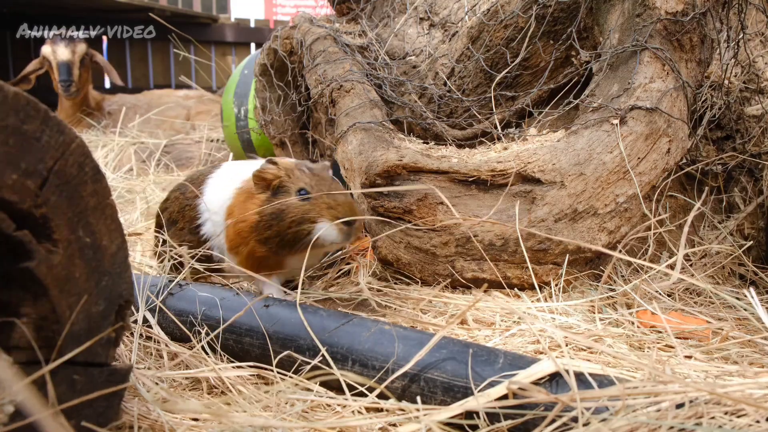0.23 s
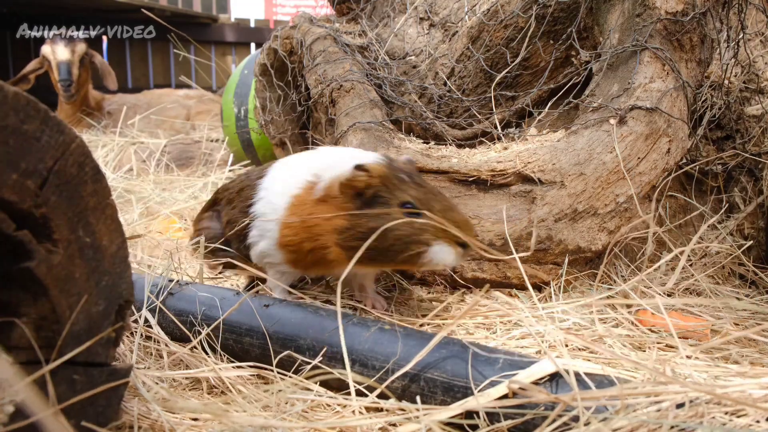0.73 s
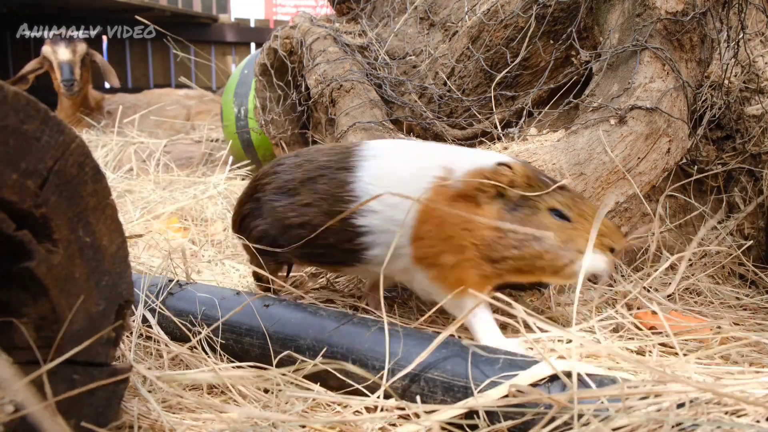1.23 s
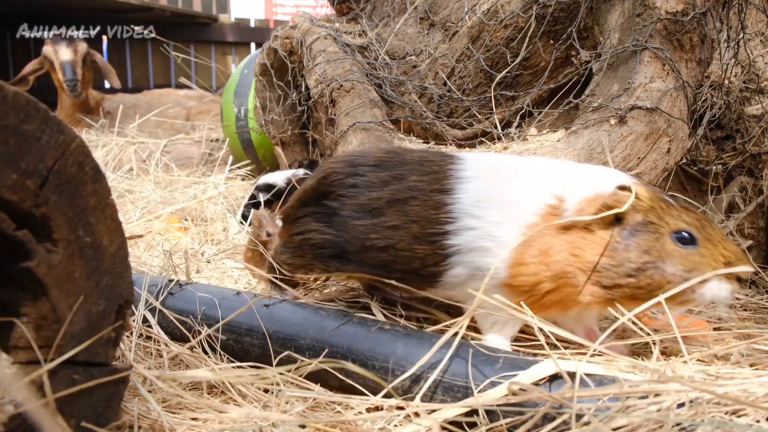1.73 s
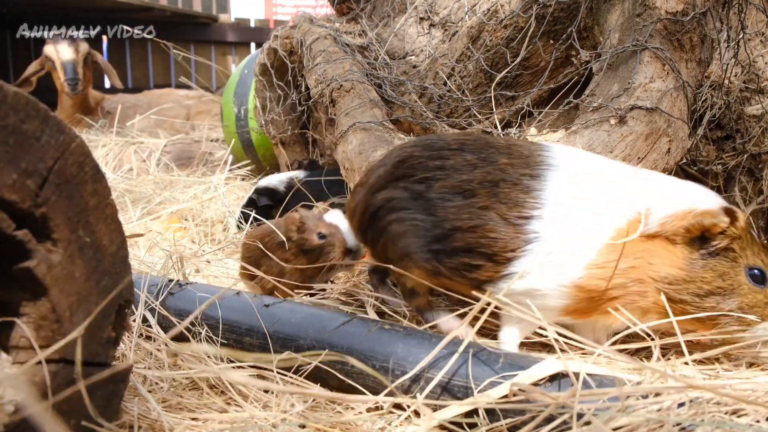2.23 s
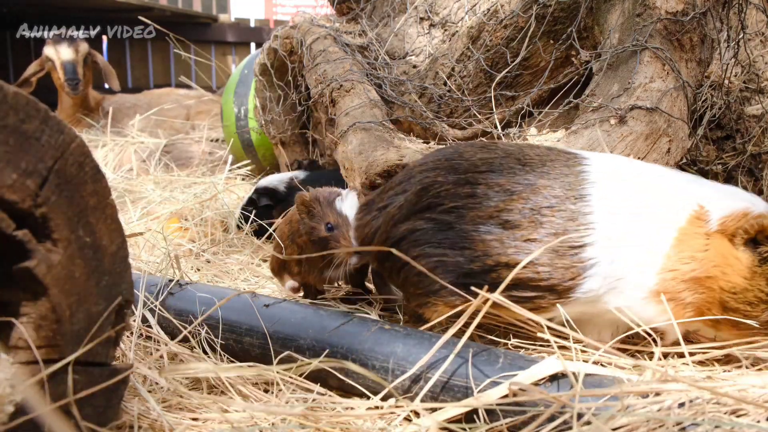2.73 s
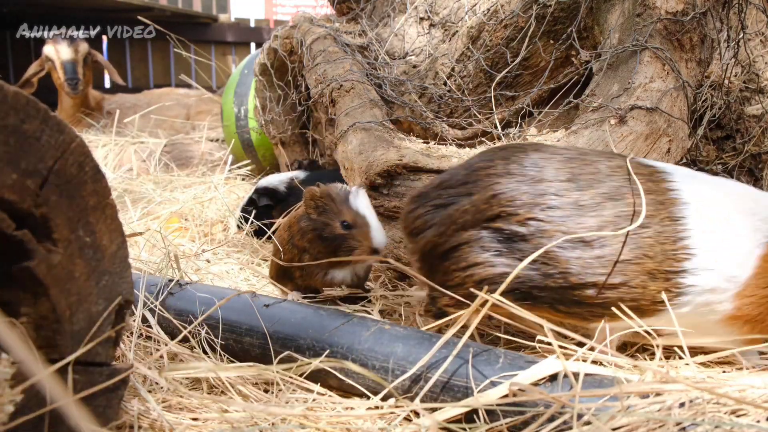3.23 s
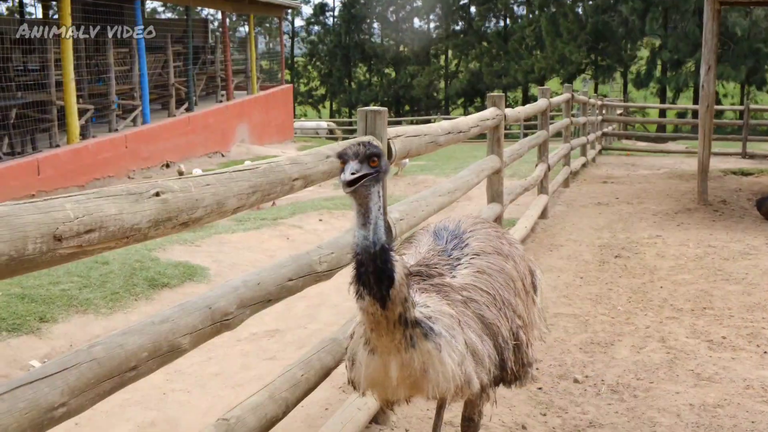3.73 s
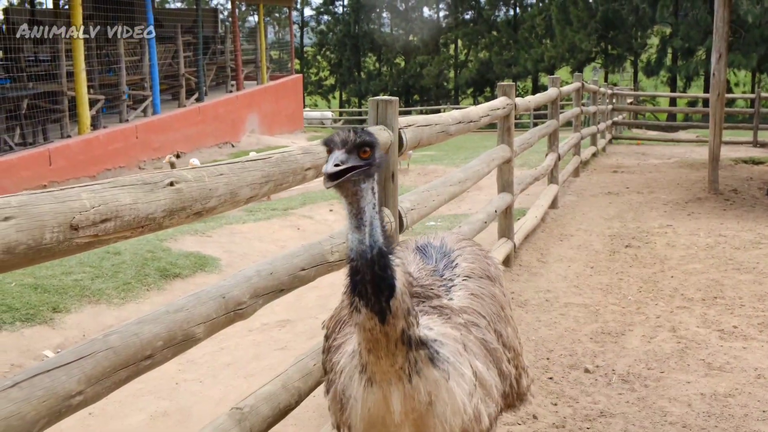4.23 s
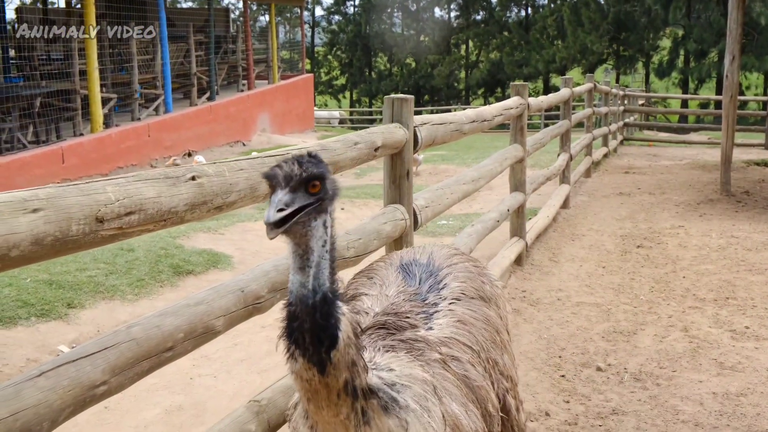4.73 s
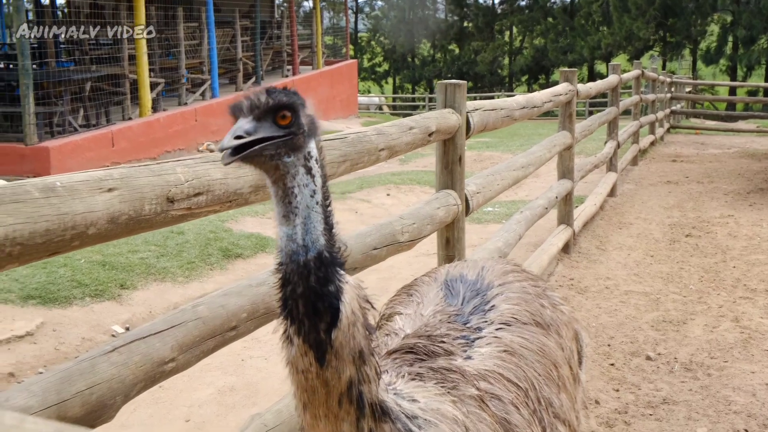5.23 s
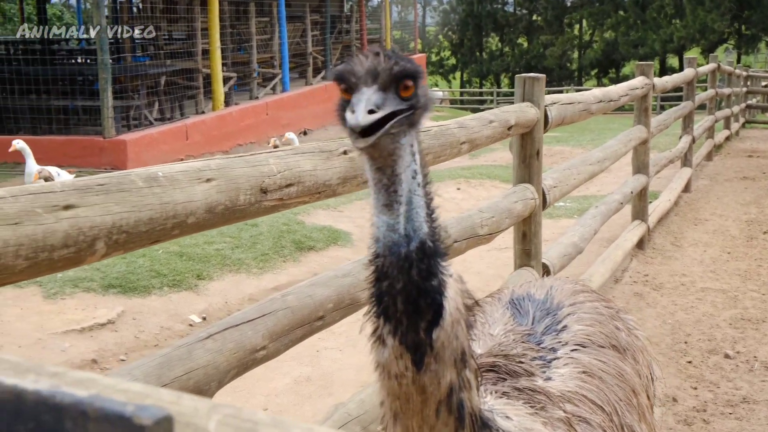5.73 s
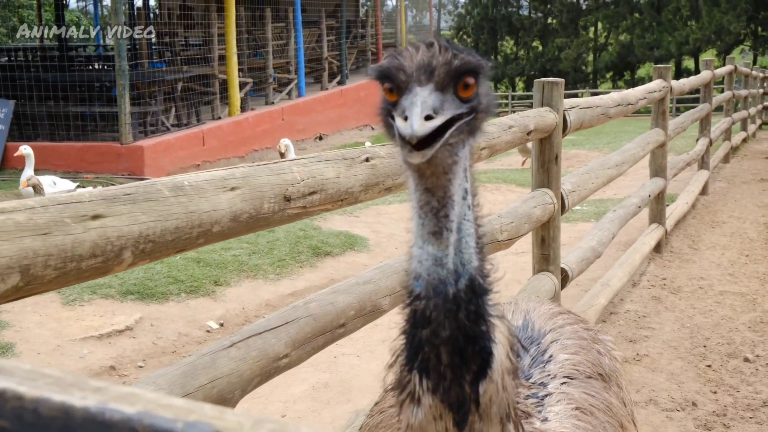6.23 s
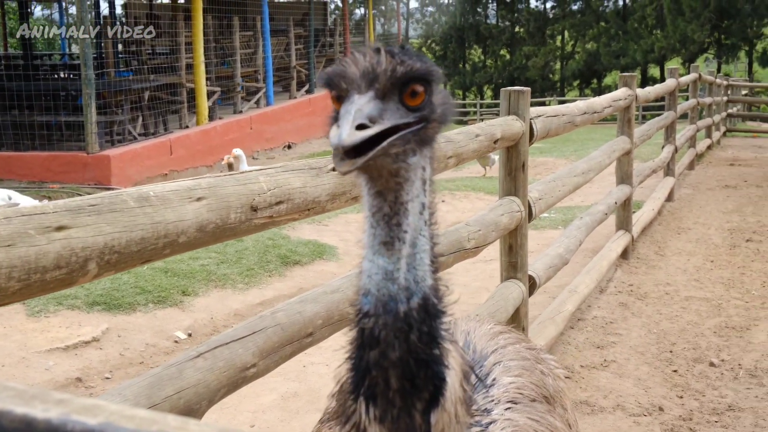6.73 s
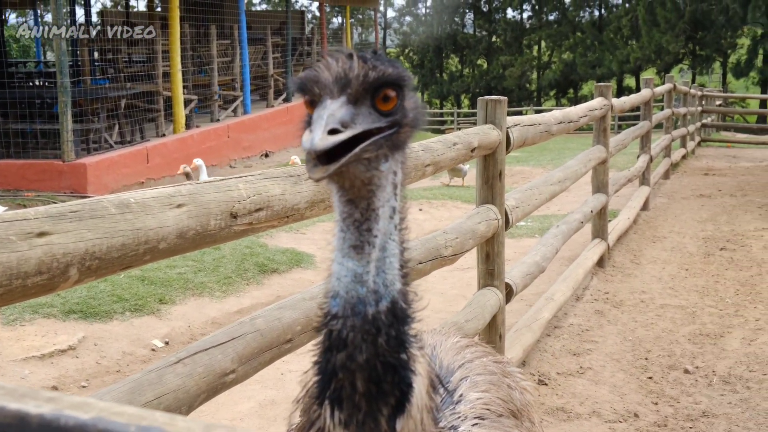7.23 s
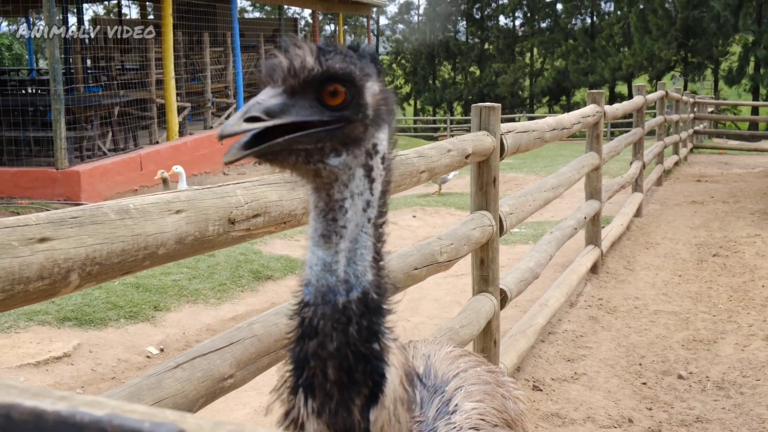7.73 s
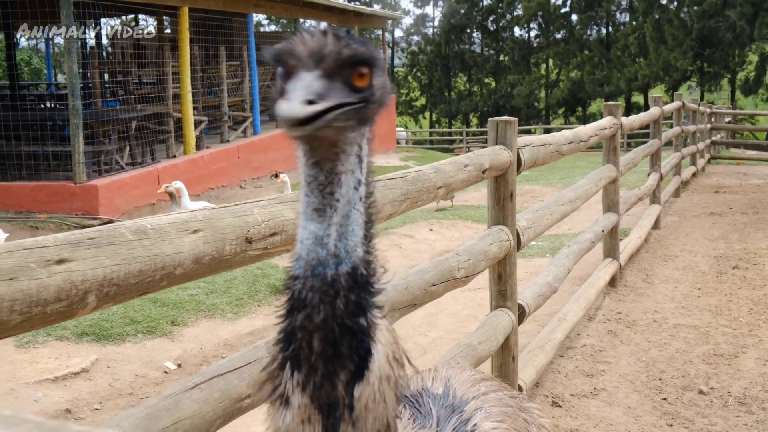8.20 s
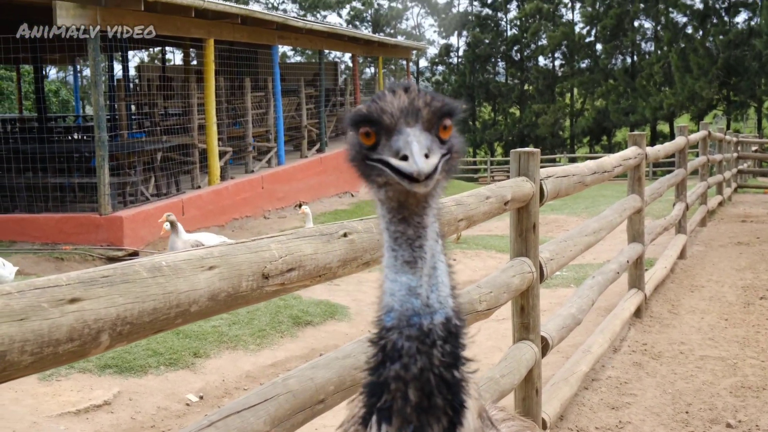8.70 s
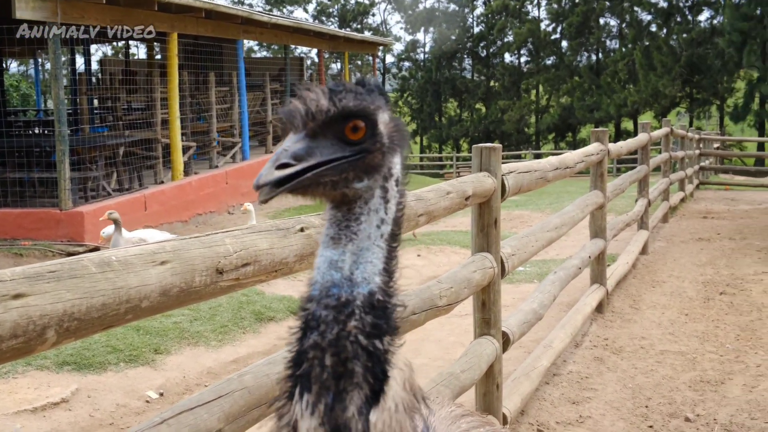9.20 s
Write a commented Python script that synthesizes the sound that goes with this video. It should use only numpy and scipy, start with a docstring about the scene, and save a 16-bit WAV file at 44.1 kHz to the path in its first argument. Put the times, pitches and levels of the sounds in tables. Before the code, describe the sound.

Very close to the microphone, a guinea pig stirs dry hay: crisp crackles, bright stalk snaps and faint dull paw pats in bursts, over quiet air. After about three seconds it fades to brief silence, then an open paddock appears with short arched bird whistles, a softer second bird to the right, gravel scuffs, wooden knocks, tiny distant birds and hissing trees.

```python
"""Dry hay rustles and snaps right beside the microphone as a guinea pig sniffs and tramples it: crackling
grains pass through stalk resonances over dull paw pats. After a short silence we stand in a windy paddock:
a near fowl and a softer second bird to the right whistle arched chirps (near sines with overtones, shaped by
a throat), with one soft trill. Around them feet scuff gravel and trees hiss (shaped noise), rails knock
(ringing modes), small birds call far off (falling glides) and a machine hums (a wavering sine)."""
import sys
import numpy as np
from scipy import signal
from scipy.fft import rfft, irfft
from scipy.io import wavfile
from scipy.ndimage import uniform_filter1d, minimum_filter1d

SR = 44100
rng = np.random.default_rng(int(sys.argv[2]) if len(sys.argv) > 2 else 0)


def to_wav(sig):
    """Store sig (one row per channel, or 1-D mono) as 16-bit WAV at the path in sys.argv[1].

    Samples outside -1..1 are clipped; the rate is SR.
    """
    pcm = np.clip(np.atleast_2d(sig), -1, 1) * 32767
    pcm = np.round(pcm).astype(np.int16)
    wavfile.write(sys.argv[1], SR, pcm.T)  # frames by channels


N = 417186
T = np.arange(N) / SR

# The pen fades out, then the paddock fades in. Four times: out from, out by, in from, in by [s].
FADES = (3.191, 3.205, 3.407, 3.428)

# Air of the pen, a broad noise. Each row: frequency [Hz], relative density [dB per Hz].
PEN_AIR = [(18, -60.5), (30, -29.5), (70, -35.5), (110, -16), (192, -6), (379, -10.5), (561, -13),
           (767, -17.5), (852, -19), (1110, -23), (2420, -23.5), (4190, -26), (15500, -25.5)]
# Steady hum in the pen. Each row: frequency [Hz], level before wavering [dB].
PEN_HUM = [(177.6, -76)]
# Machine humming at the paddock. Each row: frequency [Hz], level before wavering [dB].
MACHINE_HUM = [(134.6, -72.5)]

# Spectra of the paddock: ground and tree hiss, far wash, wind rumble.
# Each row: frequency [Hz], relative density [dB per Hz].
YARD_HISS = [(900, -25.5), (2200, 3), (4000, 4), (7300, 2.5), (9000, -3), (11000, -40.5)]
YARD_WASH = [(200, -48.5), (330, -2), (450, 3), (1000, 2.5), (1800, 1.5), (3000, -21.5), (5000, -46)]
WIND_RUMBLE = [(15, -57.5), (25, -28.5), (54, -17), (135, 0.5), (188, -7), (221, -16), (257, -25),
               (287, -44.5), (330, -1), (430, -20.5), (730, -120)]
# Treble of gravel and trees. Each row: centre [Hz], width of one pass [Hz], relative level per pass [dB].
YARD_TOP = [(9870, 1600, -1.5), (11080, 2500, 4.5), (13090, 1600, 0.5), (13900, 2300, -4.5)]
# Steady far hiss of leaves. Each row: centre [Hz], width of one pass [Hz], relative level per pass [dB].
LEAVES = [(4870, 740, -0.98), (7840, 640, -1)]
# Wind on the microphones. Each row: time [s], level before flicker [dB].
GUSTS = [(3.4, -68), (4.5, -69), (5.5, -67), (6.5, -65.5), (7.5, -68), (8.3, -69), (8.9, -61.5),
         (9.46, -67)]
# Wind in the trees. Each row: time [s], hiss before flicker [dB], treble minus hiss [dB].
BREEZE = [(3.42, -59.5, -1), (3.65, -49, 2), (3.9, -53, -3.5), (4.1, -60.5, -3.5), (4.42, -61.5, -1.5),
          (4.9, -61, -4), (5.5, -52.5, -5.5), (5.9, -54.5, -7), (6.3, -54, -4), (6.7, -58, -4.5),
          (6.95, -57, -10), (7.6, -54, 0), (7.7, -62.5, 3), (8.05, -58, -14.5), (8.45, -57, -6.5),
          (8.9, -48.5, -4.5), (8.94, -43.5, -3.5), (9.46, -45.5, 0)]
# Feet scuffing the gravel. Each row: peak time [s], 20 dB rise [s], 20 dB fall [s], level before flicker [dB].
SCUFFS = [(3.51, 0.033, 0.041, -47), (3.78, 0.031, 0.026, -50), (3.955, 0.027, 0.045, -43.5),
          (4.28, 0.2, 0.17, -54), (4.465, 0.029, 0.2, -44), (4.8, 0.13, 0.061, -50),
          (4.99, 0.037, 0.071, -43), (5.13, 0.3, 0.18, -57), (5.28, 0.076, 0.022, -49.5),
          (5.4, 0.053, 0.042, -60), (5.612, 0.023, 0.023, -44), (5.73, 0.048, 0.11, -45.5),
          (5.84, 0.12, 0.17, -50), (5.962, 0.0086, 0.022, -39), (6.4, 0.06, .04, -51),
          (6.445, 0.021, 0.042, -43.5), (6.92, 0.018, 0.16, -49.5), (7.05, 0.019, 0.53, -50.5),
          (7.205, 0.03, 0.033, -48.5), (7.64, 0.059, 0.028, -52), (8.165, 0.05, 0.047, -54),
          (8.29, 0.063, 0.067, -60.5), (8.54, 0.036, 0.45, -52), (9.29, 0.03, 0.037, -49)]

# Small birds far off. Each row: start [s], length [s], start pitch [Hz], end pitch [Hz], relative level [dB].
FAR_BIRDS = [(4.266, 0.04, 4400, 3620, -49), (4.783, 0.035, 5200, 3770, -46),
             (4.82, 0.032, 3850, 3330, -46.5), (5.1, 0.026, 5140, 3900, -47.5),
             (5.133, 0.026, 3900, 3380, -46.5), (6.03, 0.041, 5040, 3800, -47),
             (6.294, .016, 4500, 3800, -49.5), (6.311, 0.024, 3950, 3430, -50),
             (7.48, 0.025, 4540, 3490, -49), (8.026, 0.02, 5000, 3720, -51),
             (8.048, 0.022, 3920, 3550, -51), (8.268, 0.014, 4450, 3700, -46),
             (8.292, 0.021, 3770, 3500, -52)]
# Dull footfalls on the dirt. Each row: start [s], relative level [dB], pitch [Hz].
FOOTFALLS = [(8.765, -37.5, 424), (8.782, -39.5, 448), (8.812, -38, 388), (9.085, -46, 470),
             (9.122, -37, 430), (9.187, -39, 437), (9.43, -43, 550)]
# Paws landing under the hay. Each row: start [s], relative level [dB], pitch [Hz].
PAWS = [(0.858, -45.5, 596), (0.933, -55, 1200), (1.02, -53, 400), (1.199, -52, 400), (1.416, -52, 447),
        (1.52, -55, 500)]
# Knocks on the fence rails. Each row: start [s], relative level [dB], added to the upper modes [dB].
KNOCKS = [(5.102, -43.5, -17), (5.419, -39, 7.5), (7.203, -56.5, 12), (7.414, -39.5, 2.5),
          (8.504, -39.5, 8), (8.517, -41, 4), (8.526, -47, 5), (8.611, -38, 6), (9.204, -49, 11)]
# Modes of a rail. Each row: nominal frequency [Hz], relative level [dB], time to fall 60 dB [s].
RAIL_MODES = [(400, 6, 0.085), (554, 18, 0.014), (900, 20, 0.0072), (1264, 4, 0.012), (1990, -1.5, 0.02)]

# Bouts of hay stirred by nose and feet. Each row: peak time [s], 20 dB rise [s], 20 dB fall [s],
# crackle level [dB], then treble, low scrape and dry sheaths, each minus the crackle [dB].
RUSTLES = [(.025, 0.061, 0.023, -39.5, 10.5, -4, -0.5), (0.077, 0.13, 0.069, -47, 7.5, -2, 0),
           (0.245, 0.011, 0.025, -55.5, 19.5, -7.5, 3.5), (0.431, 0.023, 0.058, -44.5, -4.5, -5.5, -6),
           (.66, 0.033, 0.03, -64.5, -0.5, -3, -1), (.81, 0.013, 0.072, -44.5, -16, -9, -17),
           (.86, 0.054, 0.027, -47.5, -10, -2, -11), (.965, 0.0097, 0.028, -48.5, -8, -3, -9),
           (0.981, 0.014, 0.065, -45.5, -2, -2.5, -2), (1.11, .01, .02, -63, 0, -2, -11),
           (1.163, 0.034, 0.053, -45.5, -9, -4, -2), (1.2, 0.04, 0.016, -51.5, -10, -8, -5),
           (1.3, 0.024, 0.058, -50, 1.5, -1, -2), (1.46, 0.037, 0.053, -62, -2, -3, -1),
           (1.511, 0.048, 0.038, -61.5, -7, -3, -3.5), (1.695, 0.026, 0.05, -45, -14, -9, -4),
           (1.886, 0.05, 0.059, -57, -2, -6, -3), (2.189, 0.011, 0.016, -54, 10, 10, 2),
           (2.205, 0.0089, .014, -49, 14, 9, 9), (2.235, 0.033, 0.054, -40, 8.5, 4, 4),
           (2.266, .02, .02, -42.5, 10.5, 0.5, 6), (2.305, 0.046, 0.046, -39, 5.5, -5, 6),
           (2.407, 0.01, 0.018, -52.5, 2, 2, 1), (2.46, 0.019, 0.028, -40.5, 5, 2, 7),
           (2.495, 0.032, 0.05, -39, 6.5, -2.5, 6), (2.635, 0.015, 0.023, -45.5, 15, -17, 6),
           (2.664, 0.032, 0.017, -38.5, 9, -0.5, 2), (2.7, 0.027, 0.071, -45, 10, -1.5, 3),
           (2.882, 0.017, 0.028, -53, 13, -5, 5), (3.067, 0.02, 0.053, -43, -5, -5.5, -5.5)]
# Stalks that snap. Each row: start [s], relative level [dB], relative body of the stalk [dB], crack [Hz].
SNAPS = [(0.0204, -28, -10.5, 11900), (0.03, -33, -6, 11800), (0.0378, -32, -9, 11860),
         (0.0529, -18, -25, 12140), (0.0657, -20, 4, 11500), (0.1183, -46, -25, 5500),
         (0.163, -50, -16, 12500), (0.238, -40.5, -14, 9040), (0.593, -55.5, -40, 11600),
         (0.8093, -57, 9, 5200), (0.942, -30.5, -41, 10400), (0.963, -58, -6, 5000),
         (0.9809, -44, -11, 4800), (1.108, -62, 0, 9000), (1.115, -61, -2, 8450),
         (1.272, -24.5, -47, 10900), (1.427, -30.5, -41, 10400), (1.659, -51, -19, 11200),
         (1.836, -43.5, -31, 10670), (2.1844, -35, -22, 14400), (2.193, -43, -20, 12000),
         (2.2022, -37, -17, 12400), (2.217, -35, -9, 10400), (2.2918, -23, -6.5, 12600),
         (2.2325, -31.5, -8, 7540), (2.308, -37, -11, 8950), (2.3205, -40, -20, 11000),
         (2.3323, -30, -24, 12400), (2.348, -49, -25, 12500), (2.391, -46, -25, 12000),
         (2.3945, -47, -6, 12000), (2.3985, -48, -20, 12000), (2.402, -45, -20, 12000),
         (2.4055, -49, -2, 7000), (2.456, -27, -22, 12600), (2.4587, -22.5, -25, 13600),
         (2.465, -26, -14, 7000), (2.4822, -31, -34.5, 6660), (2.4889, -17.5, -15.5, 6700),
         (2.5, -22.5, -16, 7260), (2.5086, -24, -26, 12700), (2.535, -39, -25, 11500),
         (2.589, -49.5, -5, 5600), (2.63, -33, -23.5, 13000), (2.686, -18.5, -26, 12200),
         (2.6982, -16, 3.5, 11230), (2.799, -46, -32.5, 12900), (2.876, -40, -28.5, 11500)]
# Resonances of the hay: low scrape, stalk body, dry sheaths, treble.
# Each row: centre [Hz], width of one pass [Hz], relative level per pass [dB].
HAY_LOW = [(1030, 510, -5), (1600, 1800, 7.5), (2370, 430, 2.5)]
HAY_BODY = [(3160, 820, 2), (3930, 980, -2), (5040, 1900, -3)]
HAY_SHEATH = [(6070, 1500, 0), (6650, 1100, -2), (7360, 660, 2), (8340, 1400, -2)]
HAY_TOP = [(10430, 2560, 13), (11970, 1200, 8.5), (13900, 5200, -3)]

# Whistled chirps of a near fowl and of a softer second bird to the right.
# Each row: start [s], length [s], share of the rise [0-1], start pitch [Hz],
# top pitch [Hz], end pitch [Hz], relative level [dB], swell from start to end [dB],
# sag at the top (negative lifts) [dB], relative overtones [dB], left minus right [dB],
# catch at both ends (negative lifts) [dB], flutter at the top [0-1].
CHIRPS = [ (3.485, 0.06, 0.46, 902, 1396, 856, -30.5, 1, -3.5, 5.5, -3, -7.5, 0.54),
          (4.13, 0.062, 0.53, 1030, 1336, 890, 0, 9, -12.5, -5.5, 1.5, 5, 0.32),
          (4.523, 0.071, 0.57, 1007, 1386, 750, -12, 3.5, -10.5, -7.5, 1.5, 1.5, 0.03),
          (4.994, 0.061, 0.61, 878, 1267, 754, -8.5, 10.5, -11.5, -11, 2.5, 3, 0.05),
          (5.35, 0.066, 0.67, 938, 1382, 880, -3.5, 6.5, -9.5, -18.5, 3, 22, 0.1),
          (5.767, 0.06, 0.6, 1013, 1662, 930, -17.5, -2.5, 9, -4, 3.5, 7, 0.77),
          (6.062, 0.057, 0.6, 940, 1532, 1030, -22, -2.5, 10.5, -3, 4, 21, 0.54),
          (6.127, 0.035, 0.23, 1160, 1130, 1085, -35, 0.5, 2, -8, 3.5, 5, .03),
          (6.396, 0.05, 0.23, 1140, 1216, 1005, -18.5, 11, -3, 11, -6, -3.5, 0.34),
          (6.559, 0.056, 0.67, 870, 1478, 900, 0.5, 9, -2, -12, 5, 2, 0),
          (6.743, 0.072, 0.424, 1078, 1313, 920, -16.5, 7, 0.5, 3, -7.5, 4.5, 0),
          (6.991, 0.064, 0.43, 1160, 1243, 910, -21.5, 8, -6, -6, -9, 9, .03),
          (7.081, 0.057, 0.53, 996, 1387, 890, -12.5, 3, -2.5, -20, 4.5, 5.5, 0.83),
          (7.379, 0.06, 0.4, 1225, 1188, 960, -44, -4.5, -6.5, 3, -7.5, 12, 0.03),
          (8.962, 0.047, 0.1, 1060, 1077, 865, -11, 1.5, -1, -9, 5, 19, 0.1),
          (9.278, 0.062, 0.6, 950, 1716, 900, 4, 5.5, 6, -4.5, 5, 15, 0.1)]
# Throat resonance. Each row: frequency [Hz], gain [dB].
THROAT = [(700, -26.5), (1000, -6.5), (1150, 0.5), (1330, 0.5), (1480, -4), (1600, -6.5), (1750, -0.5),
          (1950, -10), (2200, -26.5), (2650, -27.5), (3000, -27), (3500, -35.5), (4400, -23.5)]
# Relative levels of the second to fourth partial [dB].
OVERTONES = [0.5, -6, -17]
# Brief breaks in the voice, placed one by one. Each row: time [s], depth [dB], width [s].
BREAKS = [(3.5, 17, 0.0017), (3.505, 15, 0.00077), (3.5298, 17, 0.0026), (4.137, 18, 0.0039),
          (4.1523, 12, 0.0021), (4.1623, 10.5, 0.0015), (4.5265, 12, 0.0033), (4.537, 25, 0.0019),
          (4.584, 4.5, 0.0068), (5.046, 6, 0.0033), (5.366, 15, 0.002), (5.771, 5, 0.004),
          (5.778, 1, 0.0026), (5.8278, 12, 0.0016), (6.064, 6, 0.0025), (6.0832, 12, 0.0012),
          (6.0885, 10, .0015), (6.106, 40, 0.0097), (6.762, 32.5, 0.0032), (6.782, 17, 0.0022),
          (6.7944, 28, 0.0019), (6.801, 22, 0.0029), (7.026, 6, 0.0021), (7.0366, 23, 0.0016),
          (7.408, 6.5, 0.0032), (8.979, 11, 0.0016), (8.987, 13, 0.0053), (9.002, 2, 0.0037),
          (9.281, 1, 0.0023), (9.2905, 4.5, 0.002), (9.299, 14, 0.00083), (9.3053, 10, 0.002),
          (9.313, 6, .004), (9.32, 15, 0.0014), (9.3315, 13, 0.0033)]
# Faint higher glides beside the chirps: a second voice near the start, a strong overtone near the end.
# Each row: start [s], length [s], start pitch [Hz], end pitch [Hz], relative level [dB].
HIGH_GLIDES = [(3.501, .011, 1450, 1890, -33), (3.517, 0.0046, 1700, 1900, -36),
               (4.153, 0.0039, 1500, 1740, -31.5), (4.161, 0.0089, 1467, 1680, -23.5),
               (4.536, 0.0069, 1460, 1750, -24.5), (4.579, .011, 2040, 1600, -30.5),
               (5.003, 0.01, 1160, 1760, -26.5), (5.044, .012, 1900, 1450, -33),
               (5.358, 0.0083, 1300, 1864, -38.5), (5.408, .012, 1950, 1554, -39.5),
               (6.563, 0.018, 1310, 1650, -31.5), (6.61, 0.013, 1980, 1600, -48),
               (6.083, 0.0055, 1460, 1800, -37)]
# Notes of a soft trill. Each row: start [s], relative level [dB], nominal pitch [Hz].
TRILL = [(7.918, -52.5, 1150), (7.9875, -40, 1200), (8.06, -41.5, 1105), (8.1324, -46, 1190),
         (8.2032, -41.5, 1180), (8.2752, -41, 1160), (8.35, -43, 1200), (8.421, -43.5, 1140),
         (8.492, -41, 1120), (8.566, -44, 1170), (8.646, -47.5, 1090)]

RISE_BEND, FALL_BEND = 1.2, 1.01  # of a bout: 1 = straight in dB, higher = rounder top
ECHO_S, ECHO_DB = .025, -33  # decay constant and starting level of the far birds' echo
GIVE_S = .00042  # time for the fibres of a stalk to give way
ATTACK_S, RELEASE_S = .0062, .008  # of a chirp
CATCH_IN_S, CATCH_OUT_S, CATCH_WIDTH_S = .0072, .0069, .0019  # after the start, before the end, width
FLUTTER_HZ, FLUTTER_LAG_S, FLUTTER_SPAN_S = 165, .0025, .011  # dips per s, delay after the top, spread
LINGER = .6  # 0-1: how long the pitch lingers low before it climbs
RASP = .06  # share of breathy flicker in the tone
HOARSE_DB, HOARSE_RATE = -29, 1500  # breath roughens the low ends of the arch; flickers per s
OVERTONE_FADE_DB = 11  # overtones thin out towards the low ends of the arch
LIMIT = .64  # of full scale
TOP_HZ = 15700  # upper edge of the sound


def undb(db):
    """Turns decibels into an amplitude ratio."""
    return 10 ** (np.asarray(db) / 20)


def unit(x):
    """Scales a sound to rms 1."""
    return x / np.sqrt(np.mean(x ** 2))


def on_log(hz, table):
    """Reads a level in dB from a table along log frequency."""
    f, db = np.transpose(table)
    return np.interp(np.log(np.maximum(hz, 1)), np.log(f), db)


def colour(x, table):
    """Shapes x by a (Hz, dB) spectrum; rms 1."""
    gain = undb(on_log(np.fft.rfftfreq(N, 1 / SR), table))
    return unit(irfft(rfft(x) * gain, N))


def high(x, hz):
    """Third-order low cut."""
    return signal.sosfilt(signal.butter(N=3, Wn=hz, btype="high", fs=SR, output="sos"), x)


def resonate_once(x, hz, width):
    """One resonance rings at hz; a narrower one rings longer."""
    return signal.lfilter(*signal.iirpeak(hz, hz / width, SR), x)


def resonate(x, peaks, patchy_db=0.):
    """Sums parallel resonances, each wandering in level on its own; rms 1."""
    return unit(sum(undb(db + patchy_db * walk(40)) * resonate_once(x, hz, w) for hz, w, db in peaks))


def resonate_twice(x, peaks, patchy_db):
    """Two passes steepen the resonances; only the second wanders."""
    return resonate(resonate(x, peaks), peaks, patchy_db)


def noise_pat(count, hz, width):
    """A short noise through the same resonance twice."""
    return resonate_once(resonate_once(rng.standard_normal(count), hz, width), hz, width)


def walk(rate):
    """Random levels drawn `rate` times a second and joined by ramps; spread near 1."""
    k = int(SR / rate)
    return uniform_filter1d(np.repeat(rng.standard_normal(N // k + 1), k), k)[:N]


def crackle(rate, spread_db, bed):
    """Clicks of widely spread size, `rate` a second on average, over a bed of noise."""
    chance, sign, size = rng.random((3, N))
    clicks = (chance < rate / SR) * np.sign(sign - .5) * undb(-spread_db * np.log(size + 1e-4))
    return unit(clicks) + bed * rng.standard_normal(N)


def add(out, s, x):
    """Lays x into out from second s."""
    i = int(s * SR)
    out[..., i:i + x.shape[-1]] += x[..., :N - i]


def pan(x, db):
    """Spreads x over both channels; db is left minus right."""
    return x * undb(np.array([[.5], [-.5]]) * db)


def bouts(table):
    """Level in dB of overlapping swells, whose powers add; rise and fall are the times for 20 dB."""
    power = np.full(N, 1e-12)
    for s, rise, fall, db in table:
        span = slice(max(int((s - 2 * rise) * SR), 0), int((s + 3 * fall) * SR))
        dt = T[span] - s
        slope = np.where(dt < 0, np.abs(dt / rise) ** RISE_BEND, np.abs(dt / fall) ** FALL_BEND)
        power[span] += undb(db - 20 * slope) ** 2
    return 10 * np.log10(power)


def dip(t, depth_db, width):
    """A brief drop in gain around t = 0; a negative depth lifts it."""
    return 1 - (1 - undb(-depth_db)) * np.exp(-(t / width) ** 2)


def patchy(x, depth_db, width_hz, hold_s):
    """Lets patches of the spectrum swell and sink on their own."""
    spec = signal.stft(x, nperseg=256)[2]
    field = rng.standard_normal(spec.shape[-2:])
    for axis, span in enumerate((width_hz * 256 / SR, hold_s * SR / 128)):
        size = max(int(span), 1)
        field = uniform_filter1d(uniform_filter1d(field, size, axis), size, axis)
    return signal.istft(spec * undb(depth_db * unit(field)), nperseg=256)[1][..., :N]


def stereo(mid, side, side_db):
    """Adds a side signal with opposite signs left and right."""
    return mid + undb(side_db) * side * np.array([[1], [-1]])


def wide(table, side_db, bed):
    """Coloured noise with some grit; left and right partly unlike."""
    mid = colour(crackle(640, 2.3, bed), table)
    return stereo(mid, colour(rng.standard_normal(N), table), side_db)


def whistles(table, broken_db, wobble):
    """Thin gliding tones, broken up by a quick flutter and unsteady in pitch."""
    out, waver = np.zeros(N), 1 + wobble * walk(400)
    for s, length, start_hz, end_hz, db in table:
        u = T[:int(length * SR)] / length
        hz = (start_hz + (end_hz - start_hz) * u) * waver[int(s * SR):][:len(u)]
        add(out, s, undb(db) * np.sin(np.pi * u) * np.sin(2 * np.pi * np.cumsum(hz) / SR))
    return out * undb(broken_db * (walk(120) + walk(700)))


def hum(lines, waver_db):
    """Steady tones whose levels waver."""
    return sum(np.sqrt(2) * undb(db + waver_db * walk(1.1)) * np.sin(2 * np.pi * hz * T) for hz, db in lines)


def pen_air():
    """Faint, nearly mono noise of the pen, slowly unsteady, with its hum."""
    return undb(-67.0 + .91 * walk(6.8)) * wide(PEN_AIR, -19.5, 7.0) + hum(PEN_HUM, 3.8)


def far_leaves():
    """A steady far hiss from resonant noise, mostly unlike left and right."""
    left, right = (resonate_twice(rng.standard_normal(N), LEAVES, 5.5) for _ in range(2))
    return undb(-57) * np.array([left, right - .35 * left])


def wind_rumble():
    """Gusts on the microphones: low noise, loosely shared by both."""
    return undb(np.interp(T, *np.transpose(GUSTS)) + 2.8 * walk(12)) * wide(WIND_RUMBLE, .5, 9.)


def gravel_and_trees():
    """Scuffed grit and wind in the trees hiss in three ranges, their powers added."""
    s, db, top_db = np.transpose(BREEZE)
    scuffs = undb(bouts(SCUFFS))
    both_db = 20 * np.log10(np.hypot(undb(np.interp(T, s, db) + 1.4 * walk(22)), scuffs))
    hiss = undb(both_db + 2.1 * walk(25)) * wide(YARD_HISS, -2.8, 1.5)
    mid = resonate_twice(crackle(640, 2.0, 1.0), YARD_TOP, 4.0)
    side = resonate_twice(rng.standard_normal(N), YARD_TOP, 4.0)
    top_level = np.hypot(undb(np.interp(T, s, db + top_db)), scuffs)
    top = top_level * undb(2.5 * walk(25)) * stereo(mid, side, -7.0)
    # the far wash of trees and sheds follows the near scuffs only in part
    wash = undb(.59 * both_db - 25.0 + 2.5 * walk(45)) * wide(YARD_WASH, -5.0, 6.9)
    return patchy(hiss + top + wash, depth_db=1.87, width_hz=500, hold_s=.02)


def far_birds():
    """Thin falling whistles, blurred by echoes on their way."""
    calls = whistles(FAR_BIRDS, 2., .03)
    echo = rng.standard_normal((2, 4000)) * np.exp(-T[:4000] / ECHO_S) * undb(ECHO_DB)
    return pan(calls, -1.5) + signal.fftconvolve(calls[None], echo, axes=1)[:, :N]


def pats(table, spread):
    """Soft, dull pats of resonant noise; spread is the resonance width over its pitch."""
    out, t = np.zeros(N), T[:3000]
    for s, db, hz in table:
        pat = unit(noise_pat(len(t), hz, spread * hz))
        add(out, s, undb(db - 6.0) * pat * t / .0054 * np.exp(1 - t / .0047))
    return out


def knocks():
    """Dull blows ring the rail's modes, each slightly detuned; the upper ones differ from blow to blow."""
    out, t = np.zeros(N), T[:2500]
    for s, db, upper_db in KNOCKS:
        for hz, mode_db, t60 in RAIL_MODES:
            decay = np.minimum(t / .0006, 1) * np.exp(-np.log(1000) * t / t60)
            ring = decay * np.sin(2 * np.pi * hz * rng.normal(1, .06) * t)
            add(out, s, undb(db - 7.0 + mode_db + upper_db * (hz > 800)) * ring)
    return high(out, 430)


def rustles():
    """Rubbing stalks crackle through the resonances of their body, treble, scrape and sheaths."""
    grains = crackle(2400, 2.5, .5) * undb(2.3 * walk(130))
    low, body, sheath = (resonate_twice(grains, peaks, 2.8) for peaks in (HAY_LOW, HAY_BODY, HAY_SHEATH))
    top = resonate_twice(grains, HAY_TOP, 3.5)
    out = undb(bouts([row[:4] for row in RUSTLES])) * body
    for column, part in enumerate((top, low, sheath), 4):
        out += undb(bouts([row[:3] + (row[3] + row[column],) for row in RUSTLES])) * part
    return patchy(out, depth_db=2.0, width_hz=600, hold_s=.015)


def snaps():
    """A stalk's fibres give way with a high crack and splinters; its body answers lower down."""
    out, t = np.zeros(N), T[:600]
    give = t / GIVE_S * np.exp(1 - t / GIVE_S)
    modes = sum(gain * np.sin(2 * np.pi * hz * t) for hz, gain in ((2900, 1), (6300, .62), (1100, .5)))
    thud = t / .00022 * np.exp(1 - t / .00025) * modes
    for s, db, body_db, hz in SNAPS:
        crack = 1.11 * give ** 2 * np.sin(2 * np.pi * hz * t)
        splinters = 2.23 * noise_pat(len(t), hz, .41 * hz)
        crack += splinters * (.4 * give ** 2 + .05 * np.exp(-t / .002))
        add(out, s, undb(db) * (2.76 * crack + undb(body_db + 7.5) * thud))
    return out


def hay():
    """Rustling and snapping stalks close by, thinned by two low cuts."""
    return high(high(rustles() + snaps(), 660), 270)


def arch(u, rise, start_hz, top_hz, end_hz, away):
    """Pitch in Hz of one chirp, climbing to its top and falling again."""
    climbing = u < rise
    leap = top_hz / start_hz - 1.4
    # high leaps level off early and drop straight
    bend = np.where(climbing, np.clip(1.244 + 1.7 * leap, .8, 3), np.clip(1.8 - 1.5 * leap, 1, 3))
    path = np.where(climbing, away + LINGER * (np.sin(np.pi / 2 * away) - away), away)
    return top_hz - (top_hz - np.where(climbing, start_hz, end_hz)) * path ** bend


def voice(hz, away, over_db, waver, hoarse):
    """A near sine and its overtones; the throat favours whichever partial passes its resonance."""
    phase = 2 * np.pi * np.cumsum(hz * (1 + .016 * waver)) / SR
    breath = 1 + undb(HOARSE_DB) * (.2 + away) * hoarse
    tone = undb(on_log(hz, THROAT)) * np.sin(phase) * breath
    overtones = sum(undb(db + over_db + on_log(k * hz, THROAT)) * np.sin(k * phase)
                    for k, db in enumerate(OVERTONES, 2))
    return tone + undb(3.4 * waver - OVERTONE_FADE_DB * away) * overtones


def chirp_edge(u, length, rise, catch_db, flutter, rasp):
    """Gain of one chirp: soft ends where the voice catches, and a stutter around the top."""
    since, left = u * length, (1 - u) * length
    edge = np.clip(np.minimum(since / ATTACK_S, left / RELEASE_S), 0, 1) * (1 + RASP * rasp)
    edge *= dip(since - CATCH_IN_S, catch_db, CATCH_WIDTH_S) * dip(left - CATCH_OUT_S, catch_db, CATCH_WIDTH_S)
    top = (u - rise) * length - FLUTTER_LAG_S
    stutter = np.exp(-(top / FLUTTER_SPAN_S) ** 2) * np.cos(np.pi * FLUTTER_HZ * top) ** 2
    return edge * (1 - np.clip(flutter, 0, 1) * stutter)


def chirps():
    """Each whistle arches up and down in pitch, swelling and sagging on its way, with breaks in the voice."""
    out, wanders = np.zeros((2, N)), (walk(300), walk(450), walk(HOARSE_RATE))
    for (s, length, rise, start_hz, top_hz, end_hz, db,
         swell_db, sag_db, over_db, pan_db, catch_db, flutter) in CHIRPS:
        u = T[:int(length * SR)] / length
        waver, rasp, hoarse = (w[int(s * SR):][:len(u)] for w in wanders)
        away = np.where(u < rise, 1 - u / rise, (u - rise) / (1 - rise))  # 0 at the top of the arch
        tone = voice(arch(u, rise, start_hz, top_hz, end_hz, away), away, over_db, waver, hoarse)
        edge = chirp_edge(u, length, rise, catch_db, flutter, rasp)
        sag_width = np.where(u < rise, .5, .25 if sag_db > 0 else .42)
        level = undb(db + swell_db * (u - 2.0) - sag_db * np.exp(-(away / sag_width) ** 2))
        add(out, s, pan(np.sqrt(2) * tone * edge * level, pan_db))
    for s, depth_db, width in BREAKS:
        near = slice(int((s - .02) * SR), int((s + .02) * SR))
        out[:, near] *= dip(T[near] - s, depth_db, width)
    return out


def trill():
    """Short soft notes, each gliding upward."""
    out, t = np.zeros(N), T[:600]
    for s, db, hz in TRILL:
        swell = np.sin(np.pi * np.clip(t / .0076, 0, 1))
        add(out, s, undb(db + 5.0) * swell * np.sin(2 * np.pi * hz * t * (.895 + 11 * t)))
    return pan(out, 2.3)


def whistling_birds():
    """Arched chirps, the faint higher glides beside them and the trill, with a short scatter from fence and sheds."""
    out = chirps() + pan(whistles(HIGH_GLIDES, 1.0, .0091), 2.) + trill()
    scatter = rng.standard_normal((2, 3000)) * np.exp(-T[:3000] / .008) * undb(-54)
    return high(out + signal.fftconvolve(out, scatter, axes=1)[:, :N], 815)


def scene():
    """The pen first, close to the hay; after a short silence, the open paddock."""
    pen = pen_air() + pan(hay() + pats(PAWS, spread=.52), .33 * walk(200))
    paddock = far_leaves() + wind_rumble() + hum(MACHINE_HUM, 2.4) + gravel_and_trees() + far_birds()
    paddock += pan(knocks() + pats(FOOTFALLS, spread=.38), 1.7) + whistling_birds()
    return pen * np.interp(T, FADES[:2], (1, 0)) + paddock * np.interp(T, FADES[2:], (0, 1))


def record(dry):
    """A quick limiter holds down the loudest peaks of both channels together; then the top is cut."""
    gain = LIMIT / np.maximum(np.abs(dry.mean(axis=0)), LIMIT)
    gain = uniform_filter1d(minimum_filter1d(gain, size=89), size=45)
    return signal.sosfilt(signal.ellip(8, .2, 70, TOP_HZ, fs=SR, output="sos"), dry * gain)


dry = scene()
out = record(dry)
to_wav(out)
```